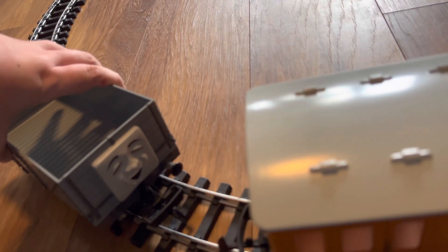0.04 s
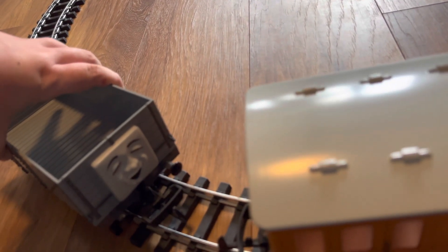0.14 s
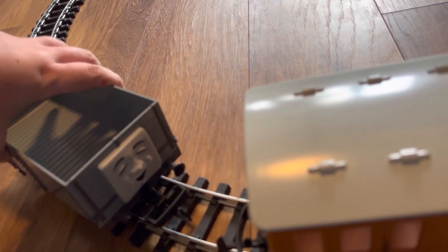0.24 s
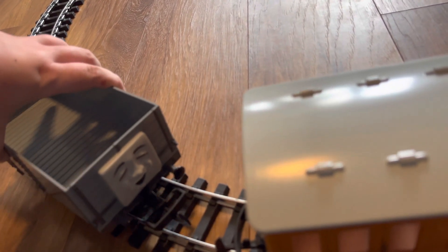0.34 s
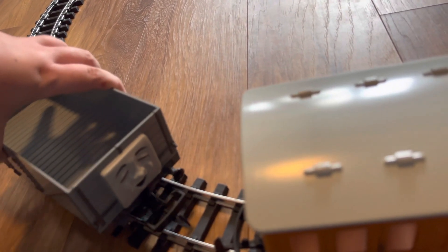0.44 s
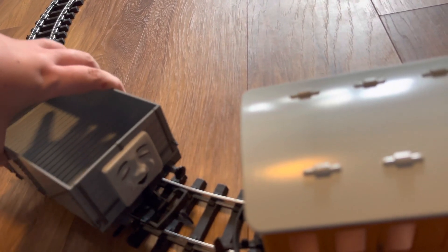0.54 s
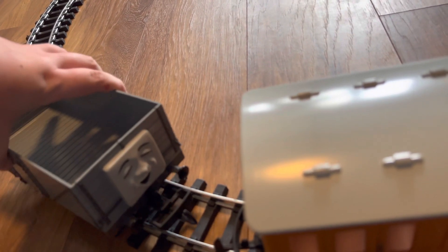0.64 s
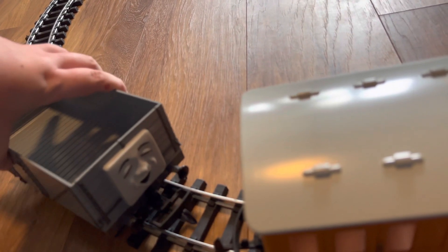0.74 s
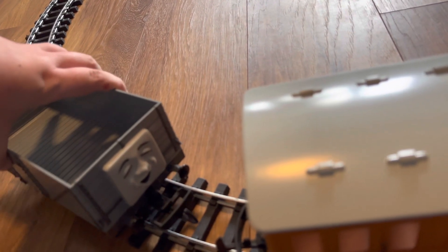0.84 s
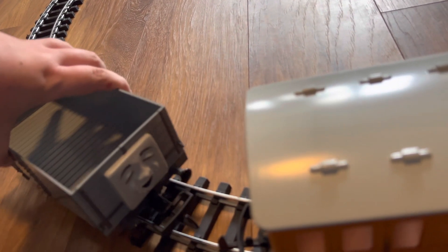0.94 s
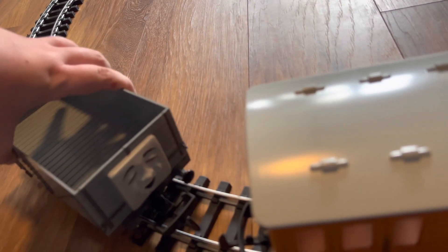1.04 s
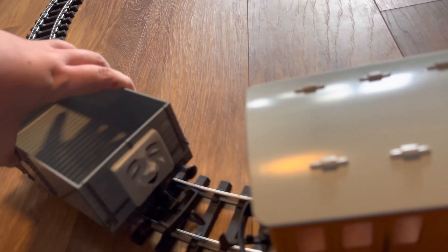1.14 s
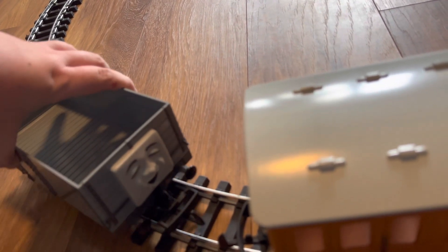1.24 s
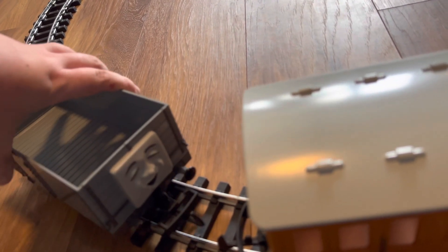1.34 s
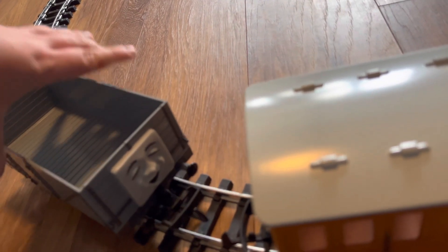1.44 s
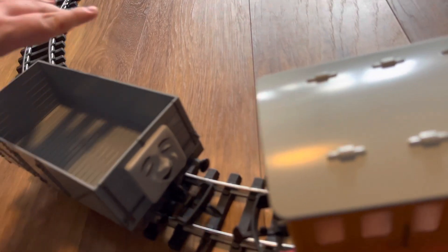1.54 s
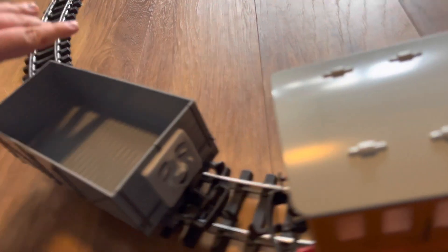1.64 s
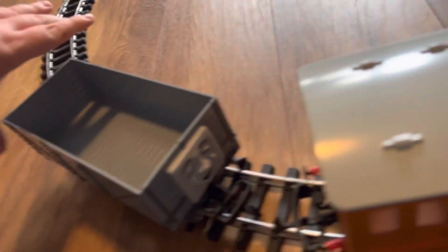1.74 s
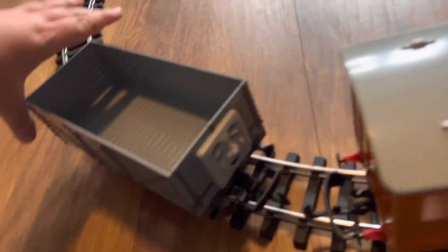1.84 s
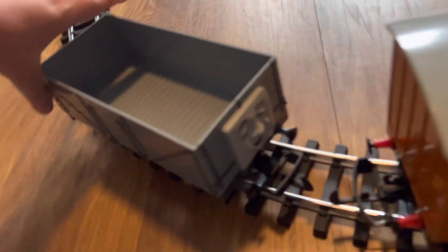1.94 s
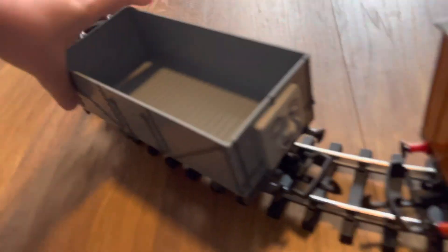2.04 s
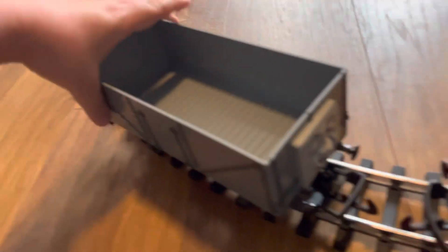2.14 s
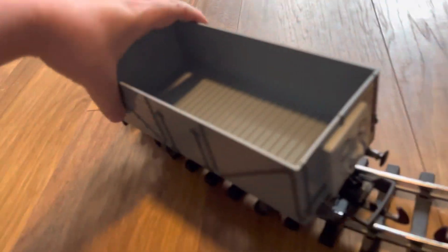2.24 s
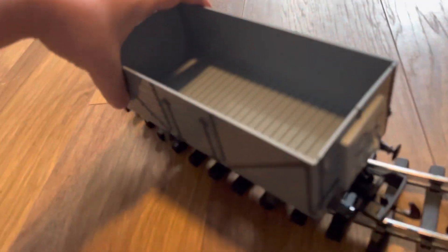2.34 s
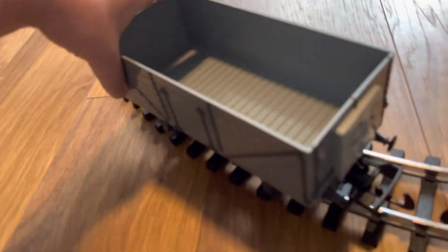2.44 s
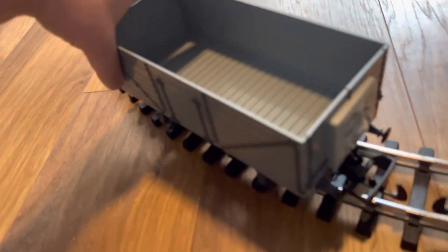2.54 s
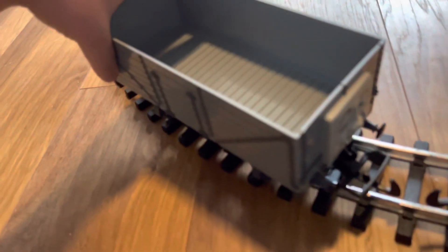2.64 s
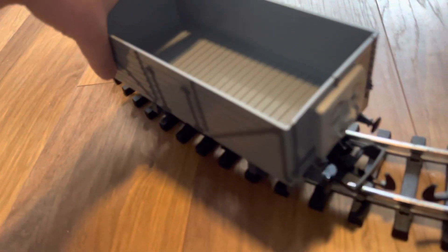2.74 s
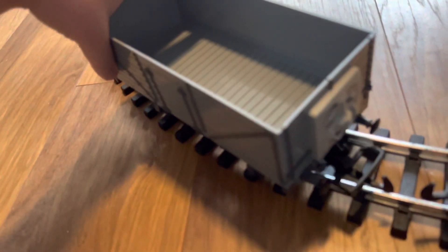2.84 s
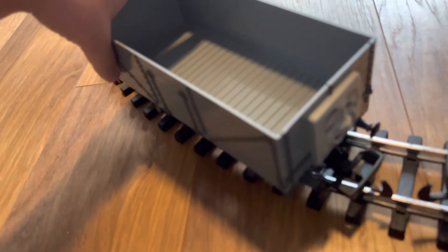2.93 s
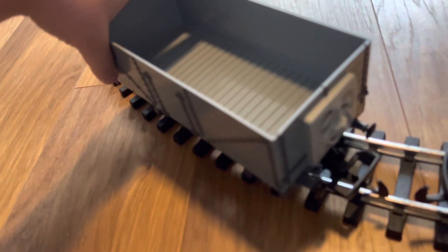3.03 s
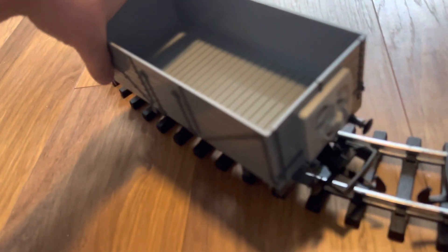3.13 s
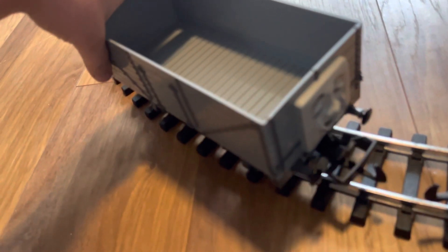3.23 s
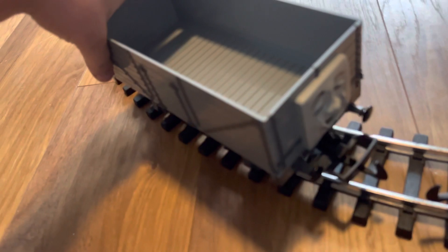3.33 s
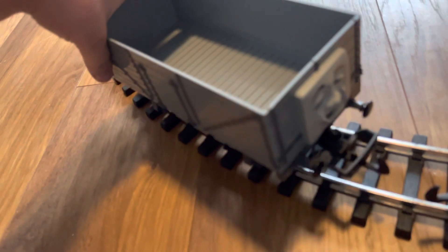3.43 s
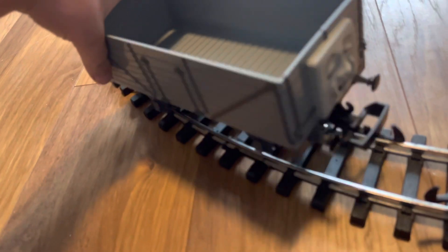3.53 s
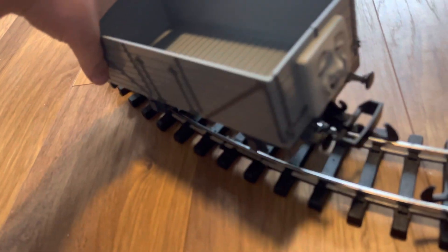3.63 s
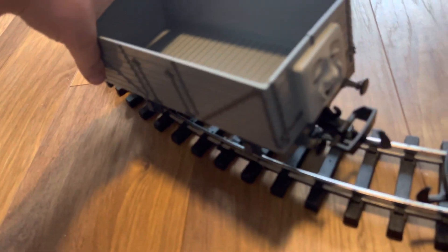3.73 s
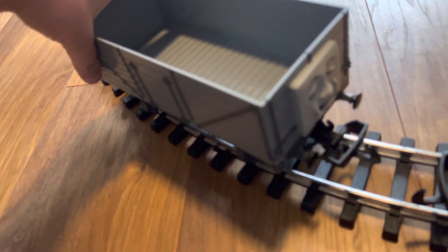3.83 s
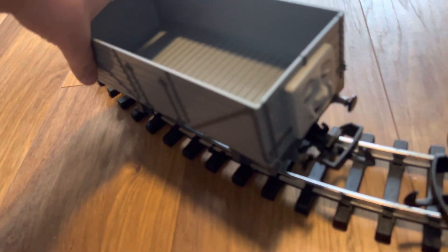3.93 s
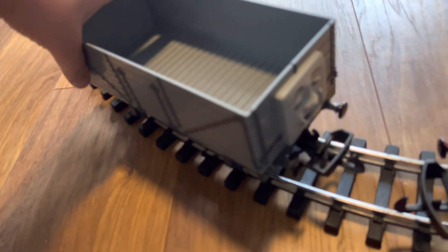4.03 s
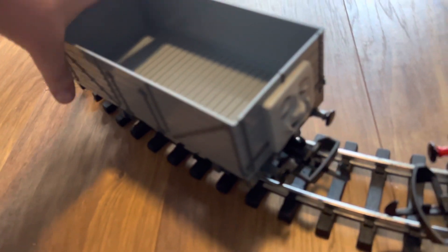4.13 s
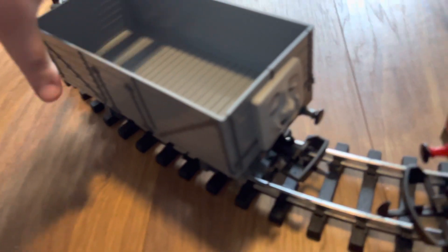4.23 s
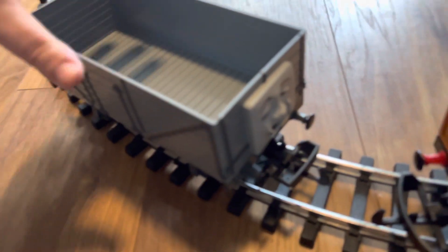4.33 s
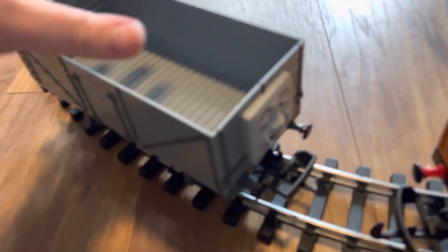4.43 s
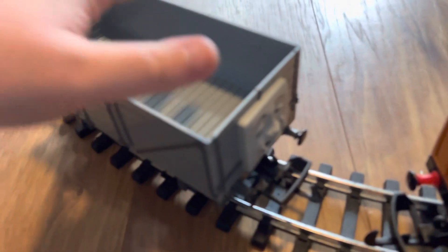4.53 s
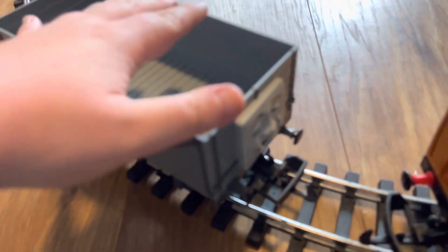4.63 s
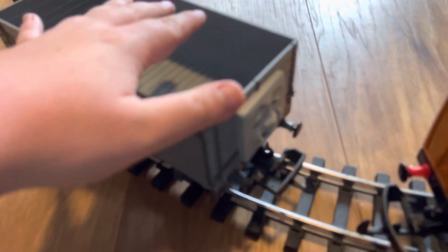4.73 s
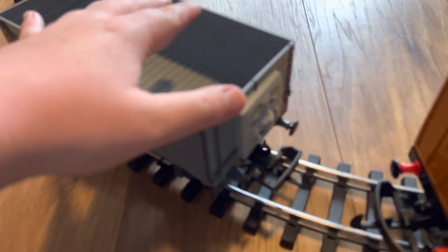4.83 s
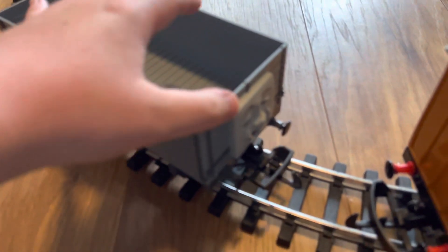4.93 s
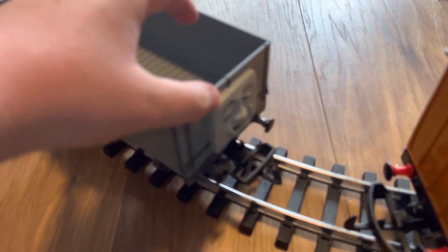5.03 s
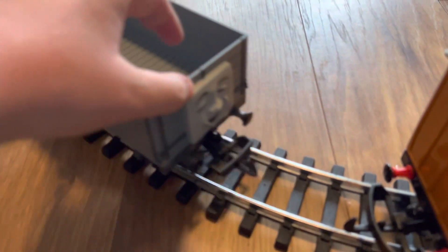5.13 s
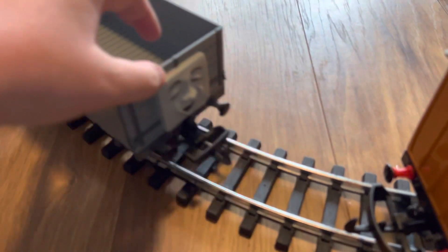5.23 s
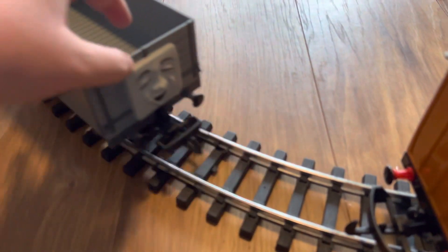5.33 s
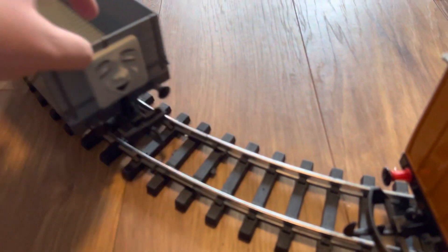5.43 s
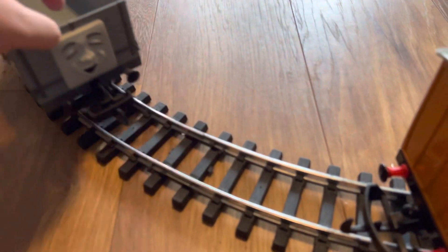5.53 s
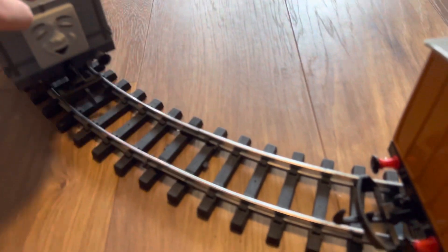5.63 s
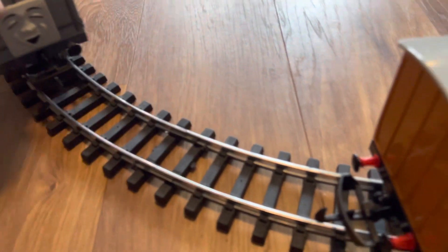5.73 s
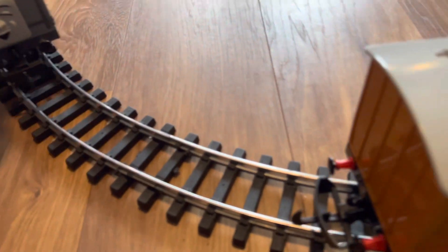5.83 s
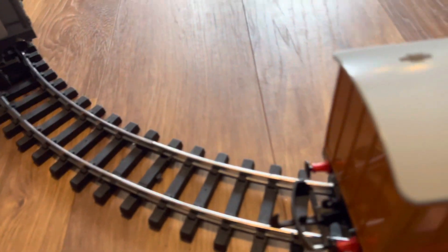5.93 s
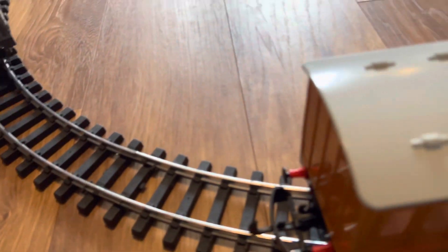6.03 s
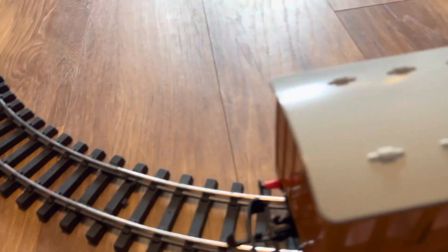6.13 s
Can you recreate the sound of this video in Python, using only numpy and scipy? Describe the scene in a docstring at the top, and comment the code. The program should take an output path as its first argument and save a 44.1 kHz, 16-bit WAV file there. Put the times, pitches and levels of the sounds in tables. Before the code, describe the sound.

Close, uneven clacks of a plastic toy wagon being set on its track, ending in a short, scraping roll.

```python
"""Toy wagons on a wooden floor

Hard plastic wagons are nudged, knocked and set down on toy rails, close by. Each contact rings the
hollow wagon box and thumps the floor; wheels rumble and a hand rubs the plastic. At the end a wagon
rolls off, scraping and squealing. A small room answers, over a faint murmur of air."""
import sys
import numpy as np
from scipy import signal
from scipy.fft import rfft, irfft, next_fast_len
from scipy.io import wavfile
from scipy.ndimage import uniform_filter1d

SR = 44100
rng = np.random.default_rng(int(sys.argv[2]) if len(sys.argv) > 2 else 0)


def bounce(signal):
    """Save signal as a 16-bit WAV file at the path given by the first command-line argument."""
    frames = np.transpose(np.atleast_2d(signal))
    limited = np.clip(frames, -1, 1)
    pcm = np.round(limited * 32767).astype(np.int16)
    wavfile.write(sys.argv[1], SR, pcm)


N = 272044


def undb(db):
    """Gain of a dB value."""
    return 10 ** (np.asarray(db) / 20)


def level(x, db):
    """Scale to an rms level."""
    return x * undb(db) / np.sqrt(np.mean(x ** 2))


def unit(x):
    """Scale each row to a peak of 1."""
    return x / np.max(np.abs(x), axis=-1, keepdims=True)


def colour(x, curve):
    """EQ through (freq_hz, gain_db) points."""
    hz, db = np.transpose(curve)
    size = next_fast_len(x.shape[-1])
    f = np.fft.rfftfreq(size, 1 / SR) + 1
    return irfft(rfft(x, size) * undb(np.interp(np.log(f), np.log(hz), db)), size)[..., :x.shape[-1]]


def resonate(x, hz, t60):
    """One mode: a decaying sine for every push; a broad second pass keeps its skirts steep."""
    w = 2 * np.pi * hz / SR
    radii = np.exp(-np.log(1000) / (t60 * SR)), np.exp(-w / 2)
    narrow, broad = [[1, -2 * r * np.cos(w), r * r] for r in radii]
    return signal.sosfilt([[1, 0.00077, -1.28, *narrow], [1, 0.032, -0.2, *broad]], x)


def flicker(depth_db, rate_hz):
    """A gain that glides between random levels."""
    hold = int(SR / rate_hz)
    steps = np.repeat(rng.standard_normal(N // hold + 1), hold)
    return undb(depth_db * uniform_filter1d(steps, hold)[:N])


def swells(table):
    """Each row rises and falls once; one gain envelope per level column."""
    t = np.arange(N) / SR
    return sum(undb(db)[:, None] * np.sin(np.pi * np.clip((t - start) / length, 0, 1))
               for start, length, *db in table)


def stereo(mid, side, side_db):
    """Mid and side to left and right; the bass stays centred."""
    side = signal.sosfilt(signal.butter(1, 600, "high", fs=SR, output="sos"), side)
    return mid + undb(side_db) * side * np.array([[1], [-1]])


def shake(modes, t60_scale=1, flicker_db=3, bumps_per_s=1500):
    """Rail roughness, a dense uneven patter, shakes some modes; each swells on its own."""
    patter = (rng.random((2, N)) < bumps_per_s / SR) * rng.standard_normal((2, N))
    ring = sum(level(resonate(patter, hz, t60_scale * t60), db) * flicker(flicker_db, 25)
               for hz, db, t60 in modes)
    return level(ring, 0)


# Room tone EQ: freq_hz, gain_db
AIR_EQ = [(15, -0.5), (25, 0.5), (153, 4.5), (439, -9), (677, -16.5), (1610, 3), (2350, -5), (2910, -2.5),
          (6560, -21.5), (8360, -28.5), (10100, -40), (11900, -40), (16000, -45)]


def air(level_db=-65.5, hum_hz=140, hum_db=-77):
    """Room tone that breathes a little, with the wavering hum of a distant appliance."""
    mid, side = colour(rng.standard_normal((2, N)), AIR_EQ)
    side = colour(side, [(60, 1), (400, -6), (1500, 0)])
    hum = level(resonate(rng.standard_normal(N), hum_hz, t60=0.1905), hum_db)
    return level(np.array([mid + side, mid - side]) * flicker(1.2, 0.5), level_db) + hum


def room(x, t60_s=0.16, treble_fade_s=0.017, dull_hz=5300, mid_db=-25):
    """A small room's reflections: short, wide and duller than the direct sound."""
    t = np.arange(SR // 4) / SR
    echo = rng.standard_normal((2, len(t))) * undb(-60 * t / t60_s) * np.clip(t / 0.0013 - .5, 0, 1)
    dark = colour(echo, [(dull_hz * 1.3, 0), (dull_hz * 2, -40)])
    echo = dark + (echo - dark) * undb(-60 * t / treble_fade_s)
    echo = colour(echo, [(60, -6), (300, 0), (dull_hz, -2), (16000, -10)])
    echo = stereo(*echo, 13.24) * undb(mid_db) / np.sqrt(np.sum(echo[0] ** 2))
    return signal.fftconvolve(x[:1], echo, axes=1)[:, :x.shape[1]]


# Rubbed plastic EQ: freq_hz, gain_db
FRICTION_EQ = [(1180, -77), (2000, -3), (6250, -3), (9130, -7.5), (10100, 4), (12000, 0.5), (15800, 0),
               (16500, -52.5)]


def friction_hiss(rub, flange, resting_hand_db=-75.5):
    """Skin and wheel flanges slide on plastic with a bright, restless hiss."""
    hiss = colour(rng.standard_normal((2, N)), FRICTION_EQ) * flicker(1.2, 60)
    scrape = flange * flicker(1.8, 90)
    return (rub + scrape + undb(resting_hand_db)) * stereo(*level(hiss, 0), 0.88)


# Rail modes: pitch_hz, gain_db, t60_s
RAIL_MODES = [(2200, -3, .012), (2610, 0, .012), (3250, 2, .008), (4200, -5, .008), (5200, -2, .01),
              (6060, -3, .012)]


def rail_scrape(flange, gain_db=-8.5):
    """Wheel flanges scrape a gritty ring out of the rail."""
    return flange * undb(gain_db) * stereo(*shake(RAIL_MODES, flicker_db=3.5, bumps_per_s=600), -3)


# Squeals: start_s, length_s, pitch_hz, level_db
SQUEALS = [(5.333, 0.11, 1770, -49), (5.396, 0.074, 1775, -35.5), (5.422, 0.24, 1790, -48.5),
           (5.592, 0.072, 4240, -49), (5.628, 0.18, 1833, -48)]


def wheel_squeals(t60_s=0.03):
    """Wheels squeal briefly, each time on one narrow resonance."""
    return sum(swells([(start, length, db)]) * stereo(*shake([(hz, 0, t60_s)], flicker_db=-3.5), -6)
               for start, length, hz, db in SQUEALS)


# Box and wall modes of a wagon on its wheels: pitch_hz, gain_db, t60_s (before t60_scale)
ROLLING_BOX_MODES = [(205, -12.5, 0.02), (324, -3.5, 0.032), (437, -1.5, 0.05)]
ROLLING_WALL_MODES = [(713, -26, 0.0077), (880, 3.5, 0.033), (1010, 7, 0.013), (1241, -2, 0.054)]
BOX_LOW_HZ = 215  # the small box radiates little below this


def wheel_rumble(nudge, roll, speed):
    """Wheels shake the box, its walls and the floor board; speed brings up the walls."""
    box = nudge * stereo(*shake(ROLLING_BOX_MODES, t60_scale=0.44), -7)
    box += roll * stereo(*shake(ROLLING_BOX_MODES, t60_scale=0.53), -21)
    box = colour(box, [(BOX_LOW_HZ / 2, -18), (BOX_LOW_HZ, 0)])
    board = roll * undb(-24.5) * shake(KNOCK_MODES[:1], t60_scale=0.94)[0]
    walls = nudge * undb(-13.5) * stereo(*shake(KNOCK_MODES[5:9], t60_scale=0.3), -1.5)
    walls += roll * undb(-10.5 + 13 * speed) * stereo(*shake(ROLLING_WALL_MODES, t60_scale=0.76), -1.9)
    return box + board + walls


# A hand shifts a wagon: start_s, length_s, rumble_db, rub_db
NUDGES = [(0.449, 0.077, -58.5, -116), (1.2, 0.24, -70, -66), (1.32, 0.071, -61, -60.5),
          (1.4, 0.43, -58, -62.5), (1.8, 0.57, -69, -63.5), (2.22, 0.28, -63, -84), (2.84, 0.2, -58, -69),
          (3.089, 0.11, -60, -105), (3.29, 0.3, -54.5, -78), (4.06, 0.33, -71.5, -65),
          (4.6, 0.29, -82, -73.5)]
# The wagon rolls away: time_s, rumble_db, speed (0-1)
ROLL_AWAY = [(4.85, -76.5, 0.37), (4.948, -51.5, 0.42), (5.099, -44.5, 0.19), (5.301, -43.5, 0.52),
             (5.42, -46.5, 0.99), (5.56, -48.5, 1), (5.72, -47.5, 1), (5.87, -46.5, 0.83),
             (6.031, -55.5, 0.55), (6.17, -61, 0.16)]


def moving_wagons():
    """Small nudges, then one long roll that brightens with speed."""
    t = np.arange(N) / SR
    nudge, rub = swells(NUDGES)
    time_s, rumble_db, speeds = np.transpose(ROLL_AWAY)
    roll = undb(np.interp(t, time_s, rumble_db, left=-150))
    speed = np.interp(t, time_s, speeds)
    flange = roll * undb(-20.5 + 21.5 * speed)
    rumble = wheel_rumble(nudge, roll, speed)
    return rumble + wheel_squeals() + rail_scrape(flange) + friction_hiss(rub, flange)


def floor_thump(push, hz, t60):
    """The floor board takes the wagon's weight and booms."""
    jolt = np.diff(np.pad(push, (1, SR // 4)))
    return unit(colour(resonate(jolt, hz, t60), [(30, -19), (60, -2)]))


def loose_rattle(t, band_db, t60_s=0.22, grit_db=2):
    """Loose wheels and couplings shiver on unevenly, with the blow's colour but no pitch."""
    lows = [(60, band_db[1] - 72), (150, band_db[1] - 15)]
    bands = [(hz, db - 10 * np.log10(hz)) for hz, db in zip(BAND_HZ[1:], band_db[1:])]  # level per Hz
    shiver = colour(rng.standard_normal((2, len(t))), lows + bands) * np.sqrt(SR)
    grit = np.repeat(rng.standard_normal(len(t) // 150 + 1), 150)[:len(t)]
    return shiver * undb(grit_db * grit - 60 * t / t60_s)


def plastic_snap(burst, strength_db):
    """The bare snap of hard plastic; a softer crack has less top."""
    top_db = 0.35 * strength_db
    eq = [(1500, -18.5), (4000, -11), (7500, top_db - 3), (10000, top_db + 8), (16000, top_db + 7)]
    return unit(colour(burst, eq))


# Modes of the floor board (first row) and the struck wagon: pitch_hz, gain_db, t60_s
KNOCK_MODES = [(76, 0, .12), (210, -20, .025), (300, -14, .03), (385, -2, .035), (490, 3, .035),
               (700, -7, .02), (870, -4, .022), (1060, 1, .024), (1360, -6, .02), (1750, 2, .025),
               (2200, -3, .01), (2620, -1, .018), (3450, -9, .005), (3850, -5, .006), (4300, -2, .006),
               (4750, 0, .007), (5300, -2, .006), (6150, 1, .005), (6850, -4, .004), (7800, -5, .002)]
# Stereo width of a knock, as side EQ: freq_hz, gain_db
KNOCK_SIDE_EQ = [(300, -15), (1000, -9), (2400, -7), (4000, -2), (10000, -9)]
# Centres of the floor, box, wall, clack and crack bands: freq_hz
BAND_HZ = (75, 470, 1050, 2550, 5500)
# Hits: start_s, level_db, then relative to it box_db, crack_db, floor_db, rattle_db, clack_db
HITS = [(0.158, -49, -1.5, -21.5, -28, -15, -3.5), (0.389, -65, -11.5, -8, -27, -13, -13),
        (0.439, -49.5, -5.5, -17.5, -28.5, -8, -10), (0.614, -18.5, -22, -4, -22.5, -15.5, -4.5),
        (0.635, -30, -6, -4.5, -11.5, -9.5, -16), (0.858, -58, -5, -12, -22, -8.5, -18),
        (1.094, -71, 20.5, -7, -12, -11, 0), (1.122, -28.5, -3.5, -14.5, -24, -17.5, -2),
        (1.133, -43, 5, 0, -10, -12, 0), (1.363, -52, -13, -28, -10, -3.5, -6),
        (1.444, -50.5, -1, -57, -1.5, 0, -6.5), (1.506, -55.5, -18, -15, 0, 1, -12),
        (1.628, -53.5, 2, -12, -6, 3.5, -6.5), (1.682, -36, -18, -22.5, -11, -13, -9),
        (2.213, -37.5, 3.5, -24, -19.5, -20, -10), (2.352, -39.5, -0.5, -17.5, -24, -15.5, -2.5),
        (2.395, -46, -7.5, -27.5, -16, -18, -29), (2.491, -57, 2, -19, -10, -13.5, -23),
        (2.739, -33, -18, -6, -45.5, -12, -4.5), (2.81, -44, -9, -8, -38, -3, -20),
        (2.821, -28.5, 1, -2, -31, -17.5, -2), (2.872, -33, 0.5, -19, -19, -24, -19),
        (2.897, -47, 5, -18, -25, -16.5, -18), (2.913, -41, -3.5, -21, -40, -14, -32),
        (2.956, -47, 3.5, -16.5, -23, -11.5, -10), (3.09, -64.5, 3.5, -10, -8, -4, -17),
        (3.43, -39.5, 2, -6, -29.5, -19, 6.5), (3.501, -49.5, -2.5, -18, -21, -6.5, -19),
        (3.55, -38.5, 0, -14, -14, -20.5, 1.5), (3.821, -22.5, -8, -6.5, -64.5, -16, -9),
        (3.843, -27.5, -13, -10.5, -37.5, -25, 0), (3.853, -45.5, 14.5, -33, -37, -18, -11.5),
        (4.014, -66, -12.5, 12, -4.5, -6.5, 15.5), (4.031, -57, 8, -23, -10.5, -10, -12),
        (4.052, -31.5, -29.5, -6.5, -25.5, -21, 4.5), (4.059, -19, -6, 0.5, -32, -14.5, -0.5),
        (4.078, -33.5, -1, -11.5, -8, -10, -5), (4.092, -43.5, 8.5, 3.5, -4, -13, -20.5),
        (4.114, -38.5, 4, 0, -9, -17.5, 1), (4.403, -60, 12.5, -15, -11, -14.5, -15),
        (4.537, -74.5, -11.5, 8, 9, -19, -4), (4.959, -40, 4, -10.5, -47, -32, -13),
        (4.977, -32.5, -4.5, -9, -23.5, -13, -10.5), (5.045, -40, -0.5, -21, -18, -7.5, -19),
        (5.125, -50, 13.5, -25, -18, -15, -25)]


def wagon_knocks(contact_s=0.00677, snap_db=19, scatter_db=2.5, detune=0.02):
    """A chattering contact rings the hollow wagon; grip and place shift the modes and the echoes."""
    out, t = np.zeros((2, N + SR)), np.arange(SR // 4) / SR
    low_cut = signal.butter(3, BOX_LOW_HZ, "high", fs=SR, output="sos")
    mode_hz, mode_db, mode_t60 = np.transpose(KNOCK_MODES)
    contact = t / contact_s
    push = contact ** 2 * np.exp(-4 * contact)  # builds up, then lets go
    ring_len = SR // 10
    for start_s, level_db, box_db, crack_db, floor_db, rattle_db, clack_db in HITS:
        band_db = (floor_db, box_db, 0, clack_db, crack_db)
        chatter = push[:ring_len] * rng.standard_normal((2, ring_len))
        burst = chatter * push[:ring_len]  # shorter, so the modes below the clack ring clear
        gain_drift, pitch_drift = rng.standard_normal((2, len(mode_hz)))
        tone_db = np.interp(np.log(mode_hz), np.log(BAND_HZ), band_db)
        gains = undb(mode_db + tone_db + scatter_db * gain_drift)
        pitches = mode_hz * (1 + detune * pitch_drift)
        (floor_gain, floor_hz, floor_t60), *wagon_modes = zip(gains, pitches, mode_t60)
        ring = sum(gain * unit(resonate(burst if hz < BAND_HZ[3] else chatter, hz, t60))
                   for gain, hz, t60 in wagon_modes)
        snap = undb(crack_db + snap_db) * plastic_snap(burst, level_db + crack_db)
        wagon = undb(rattle_db) * loose_rattle(t, band_db) * np.clip(contact, 0, 1)
        wagon[:, :ring_len] += ring + snap
        mid, side = signal.sosfilt(low_cut, wagon)
        direct = mid + colour(side, KNOCK_SIDE_EQ) * np.array([[1], [-1]])
        direct = np.pad(direct, ((0, 0), (0, SR // 8)))
        thump = floor_gain * floor_thump(push, floor_hz, floor_t60)
        onset = int((start_s - .001) * SR)
        for layer in (direct + room(direct), thump):
            out[:, onset:onset + layer.shape[-1]] += undb(level_db) * layer
    return out[:, :N]


# Right channel lag: freq_hz, delay_ms
RIGHT_DELAY = [(300, .1), (1100, .22), (2400, .36), (4300, .465), (9000, .465)]


def place_left(pair):
    """The wagons stand to the left: the right side hears them later, the highs most of all."""
    size = next_fast_len(N)
    f = np.fft.rfftfreq(size, 1 / SR)
    phase = 2 * np.pi * f * np.interp(f, *np.transpose(RIGHT_DELAY)) / 1000
    return np.array([pair[0], irfft(rfft(pair[1], size) * np.exp(-1j * phase), size)[:N]])


def scene():
    """Knocks and rolling in the room, over the air."""
    rolling = moving_wagons()
    return place_left(wagon_knocks() + rolling + room(rolling)) + air()


# Balance, left minus right: freq_hz, gain_db
BALANCE_EQ = [(60, 3.5), (200, 2), (550, 7), (1100, 5), (1900, -2), (4000, 0.5), (7000, 2), (12000, -1)]
# Dulled top with deep notches at 10 and 14 kHz: freq_hz, gain_db
TREBLE_EQ = [(20, 1.5), (7500, 1), (9000, -4.5), (10000, -29.5), (11500, -13), (13000, -15.5),
             (14000, -36.5), (15300, -18.5), (17000, -52.5)]


def record(dry, top_hz=16500):
    """Left-right balance, a dulled and notched treble, and a steep top cut."""
    pair = np.array([colour(channel, [(hz, sign * db / 2) for hz, db in BALANCE_EQ])
                     for channel, sign in zip(dry, (1, -1))])
    return signal.sosfilt(signal.ellip(8, .2, 70, top_hz, fs=SR, output="sos"), colour(pair, TREBLE_EQ))


dry = scene()
out = record(dry)
bounce(out)
```